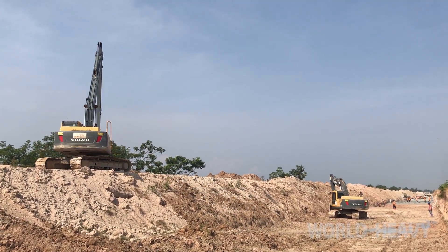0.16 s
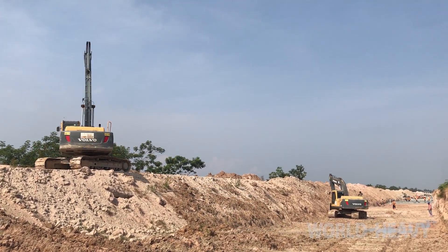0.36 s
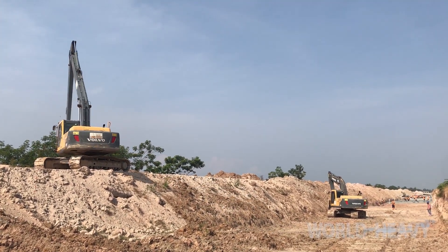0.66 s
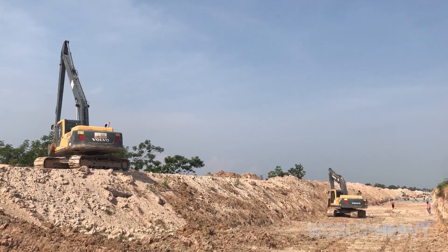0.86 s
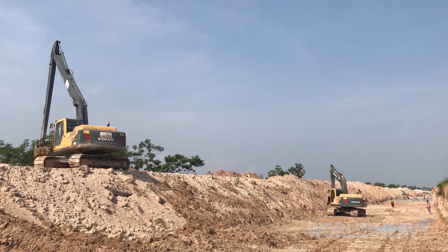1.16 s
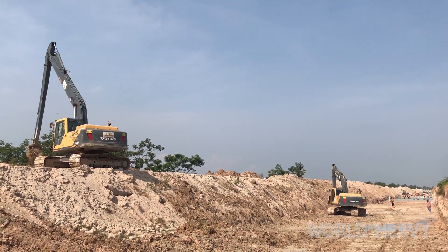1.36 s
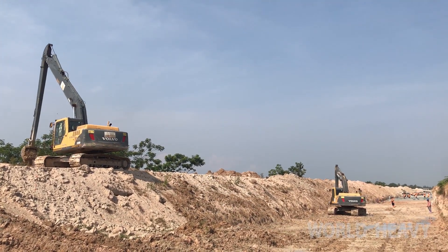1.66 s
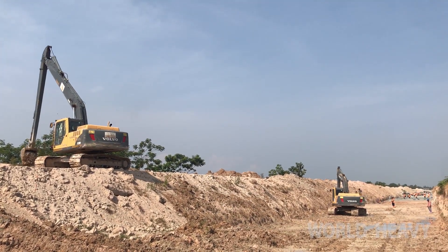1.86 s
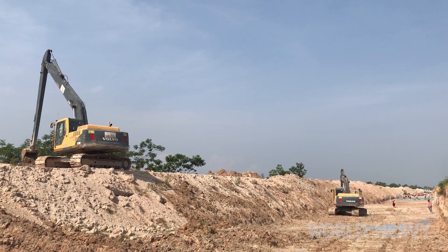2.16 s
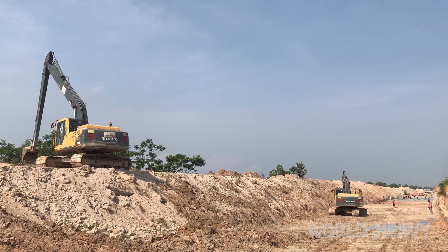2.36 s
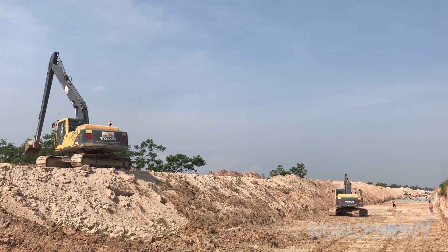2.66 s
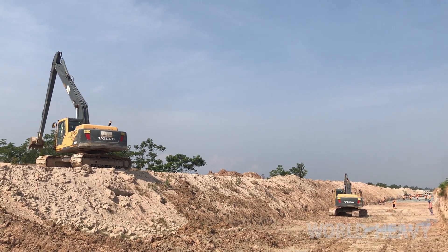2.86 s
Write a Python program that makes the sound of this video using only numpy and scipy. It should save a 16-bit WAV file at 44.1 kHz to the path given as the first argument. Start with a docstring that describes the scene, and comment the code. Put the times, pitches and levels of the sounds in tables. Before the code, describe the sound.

Low diesel engine drone of two excavators, throbbing steadily, with loose metal clanks on open ground

```python
"""A low, throbbing engine drone comes first: two six-cylinder diesel excavators work on an open earth bank.
Their firing tones, sines on each crank angle, lie up to several hertz apart and beat.
Slack pins clank in boom and bucket: contacts excite damped steel modes; dull thuds and echoes follow.
Behind them lie shaped noises: block rumble, and a roar and a hiss pulsing at the near firing rate."""
import sys
import numpy as np
from scipy import signal
from scipy.fft import rfft, irfft
from scipy.io import wavfile
from scipy.ndimage import uniform_filter1d

SR = 44100
rng = np.random.default_rng(int(sys.argv[2]) if len(sys.argv) > 2 else 0)


def volts_from_decibels(level):
    """Turn decibel levels (scalar or array-like) into linear amplitude factors."""
    exponent = np.asarray(level, float) / 20
    return 10 ** exponent


def materialize(psi):
    """Save the field psi as 16-bit PCM at rate SR to the path in sys.argv[1].

    A 1-D psi becomes a single channel; in a 2-D psi each row is a channel.
    """
    bounded = np.clip(np.atleast_2d(psi).T, -1, 1)
    quanta = np.round(bounded * 32767).astype(np.int16)
    wavfile.write(sys.argv[1], SR, quanta)


N = 132300

# Firing tone of the near engine, hunting under load [t/s, f/Hz, rms level/dB]
NEAR_FIRING = [(0.0, 77.6, -35.6), (0.1667, 78.25, -40.8), (0.3333, 80.12, -39.2), (0.5, 81.44, -43.2),
               (0.6667, 80.03, -37.8), (0.8333, 78.95, -45.7), (1.0, 78.08, -38.8), (1.1667, 76.57, -34.6),
               (1.3333, 74.57, -36.7), (1.5, 74.88, -35.2), (1.6667, 78.12, -33.7), (1.8333, 78.02, -36.9),
               (2.0, 77.07, -38.7), (2.1667, 76.92, -37.2), (2.3333, 74.47, -33.7), (2.5, 74.13, -35.3),
               (2.6667, 75.66, -37.8), (2.8333, 76.27, -36.7), (3.0, 77.04, -38.3)]
# Firing tone of the far engine [t/s, f/Hz, rms level/dB]
FAR_FIRING = [(0.0, 73.95, -47.2), (0.1667, 74.26, -45.8), (0.3333, 74.68, -41.0), (0.5, 74.94, -47.5),
              (0.6667, 74.35, -53.9), (0.8333, 74.18, -48.0), (1.0, 74.83, -48.1), (1.1667, 75.43, -45.5),
              (1.3333, 75.67, -43.3), (1.5, 75.93, -43.5), (1.6667, 76.59, -43.3), (1.8333, 76.81, -40.6),
              (2.0, 76.66, -37.3), (2.1667, 76.74, -43.5), (2.3333, 76.63, -40.9), (2.5, 76.6, -37.8),
              (2.6667, 76.78, -38.6), (2.8333, 77.22, -38.1), (3.0, 77.58, -39.9)]
# Upper exhaust orders, before facing and waver [multiple of the firing rate, level/dB]
NEAR_UPPER_ORDERS = [(7 / 6, -57), (2, -59.5), (3, -46.5), (3.7, -60.5), (6, -60.5)]
FAR_UPPER_ORDERS = [(2, -48), (8 / 3, -52.5), (13 / 3, -62.5)]
# Turning of the near house, as gains towards the listener
# [t/s, tailpipe level/dB, radiator level/dB, block level/dB]
HOUSE_TURN = [(0, -8.5, 0, 2.5), (.3, -1.5, -1.5, 1.5), (.55, -9, -1, 4), (.9, -15, 3, 4), (1.25, -7, 0, 1),
              (1.45, 5, 2, 0), (1.7, 1.5, -2.5, 0), (2.0, -0.5, -4, 5.5), (2.3, 1, -5, 1.5),
              (2.5, 2, -4, 0), (2.65, -20, -4, 2.5), (2.85, 3.5, -2.5, 1), (3, -0.5, -0.5, -1.5)]
# Clanks of pins and linkage, levels relative
# [t/s, ring level/dB, ring centre f/Hz, decay constant/s, crack level/dB]
PIN_CLANKS = [(0.148, -31.5, 1030, 0.009, -40.5), (0.162, -47, 1900, .02, -47),
              (0.155, -44, 3620, 0.025, -49.5), (0.192, -38, 860, 0.0088, -51),
              (0.348, -50, 2323, 0.037, -43), (0.363, -26, 660, 0.011, -60),
              (0.369, -36, 1720, 0.0069, -51), (0.388, -29, 660, 0.01, -48), (0.393, -41, 1640, .008, -57),
              (0.413, -36.5, 910, 0.045, -48.5), (0.453, -42, 1580, .015, -60),
              (0.74, -39, 780, 0.021, -51), (0.897, -42.5, 920, 0.033, -59), (1.598, -34, 1140, 0.013, -49),
              (1.616, -41, 2290, 0.0079, -51), (1.619, -40, 1350, 0.011, -49.5),
              (1.64, -44, 2290, 0.018, -48), (1.671, -42.5, 1110, 0.019, -54), (1.8, -48, 2300, 0.075, -47),
              (1.89, -35, 1460, 0.011, -56), (1.893, -32, 644, 0.014, -49),
              (1.9164, -24.5, 1600, 0.002, -38), (1.917, -37, 816, 0.012, -43.5),
              (1.955, -32, 5180, 0.0086, -63), (1.94, -30.5, 2290, 0.0036, -47),
              (1.949, -38, 1380, 0.0074, -44), (1.923, -29, 1110, 0.011, -66),
              (1.976, -43.5, 2290, 0.0035, -43), (2.282, -56, 1370, .008, -51),
              (2.382, -40, 814, 0.013, -52)]
# Modes of the steel boom, damped by grease and earth [f/Hz, relative level/dB, t60/s]
BOOM_MODES = [(620, 0, .03), (710, -1, .025), (830, -1, .035), (960, -3, .03), (1110, -1, .025),
              (1380, -1, .03), (1590, 0, .02), (1700, -1, .025), (2290, -2, .03), (2900, -6, .025),
              (3400, -7, .025), (4130, -9, .025), (5180, -10, .02)]
# Dull bumps of the bucket [t/s, relative level/dB, f/Hz, decay constant/s]
BUCKET_THUDS = [(1.8, -30.5, 228, 0.021), (1.952, -28.5, 315, 0.014), (0.45, -42, 66, 0.041),
                (0.392, -40, 120, 0.043), (0.14, -36, 175, .04)]
# Reflections off the earth banks [delay t/s, level/dB]
BANK_ECHOES = [(.021, -12), (.047, -15), (.083, -19)]
# Relative spectral densities of block rumble, intake and fan roar, and hydraulic and radiator hiss
# [f/Hz, level per hertz/dB]
RUMBLE_SPECTRUM = [(25, -28), (45, -10), (60, -2), (80, -11), (100, 1.5), (130, -1.5), (190, 1),
                   (240, -0.5), (270, -3.5), (330, -0.5), (400, -4), (470, -10), (520, -20.5)]
ROAR_SPECTRUM = [(400, -8.5), (500, -4), (620, 2.5), (950, -2.5), (1100, -2), (1650, -4), (1900, -10.5),
                 (2300, -7.5), (2700, -11), (3600, -11), (4400, -13), (4900, -18), (5500, -17),
                 (6500, -20.5), (7600, -27), (9000, -26.5)]
HISS_SPECTRUM = [(5000, 4.5), (7600, -7), (9200, 2.5), (10600, -5), (11500, 7.5), (12200, -10),
                 (13000, -12)]

IN_STEP_S = 0.2213  # a moment when both engines fire together
WAVER_DB, WAVER_HZ = 3.5, 9.0  # rms swing and corner rate of the upper orders
FAR_FOLLOWS, FAR_MEAN_DB = 0.55, -43  # share of the far tone's level swing its upper orders follow
RISE_SHARE = 0.25  # time constant of a burst's rise, as a share of its decay constant
RUMBLE_DB, ROAR_DB, HISS_DB = -44, -47.5, -60.5  # rms before turning and pulsing
KNOCK_DEPTH = 0.068  # amplitude modulation by the near firing


def engine(firing, orders, facing_db):
    """Harmonic synthesis: integrated firing rate gives the phase of all orders; returns sound and angle."""
    hz, tone_db = in_time(firing)
    angle = 2 * np.pi * np.cumsum(hz) / SR
    angle = angle - angle[int(IN_STEP_S * SR)]
    upper = np.zeros(N)
    for multiple, level_db in orders:
        level = volts_from_decibels(level_db + WAVER_DB * drift(WAVER_HZ))
        upper += level * np.cos(multiple * angle + rng.uniform(0, 2 * np.pi))
    return np.sqrt(2) * (volts_from_decibels(tone_db) * np.sin(angle) + volts_from_decibels(facing_db) * upper), angle


def near_engine(pipe_db):
    """Directivity: the turning tailpipe raises and lowers the upper exhaust orders."""
    return engine(NEAR_FIRING, NEAR_UPPER_ORDERS, pipe_db)


def far_engine():
    """Common-source variation: the upper orders follow part of the firing tone's level swing."""
    tone_db = in_time(FAR_FIRING)[1]
    sound, _ = engine(FAR_FIRING, FAR_UPPER_ORDERS, FAR_FOLLOWS * (tone_db - FAR_MEAN_DB))
    return sound


def contact_forces():
    """Random impact process: dense small contacts of either sign and chance size, on average 5000 a second."""
    happens = rng.random(N) < 5000 / SR
    size = 0.27 * volts_from_decibels(2.0 * np.minimum(rng.exponential(1, N), 3))
    return size * rng.choice([-1, 1], N) * happens


def cracks(crack_db, shapes):
    """Broadband radiation of impact: band-passed noise under the clank envelopes."""
    noise = signal.lfilter([1], [1, -0.9], rng.standard_normal(N))
    noise = band(band(noise, 700, 6500), 300, 9000)
    return rms_one(noise) * np.dot(volts_from_decibels(crack_db), shapes)


def clanks():
    """Modal excitation: a first blow and dying rattle drive the damped boom modes near each ring centre."""
    start, ring_db, centre_hz, length, crack_db = np.transpose(PIN_CLANKS)
    shapes = np.array([burst(s, decay) for s, decay in zip(start, length)])
    contacts = contact_forces()
    out = cracks(crack_db, shapes)
    blow_at = ((start + RISE_SHARE * length) * SR).astype(int)
    blow_share = np.minimum(1, 0.005 / length)  # full blow for decay constants up to 5 ms
    spread_db = rng.normal(0, 1.2, (len(PIN_CLANKS), len(BOOM_MODES)))
    for k, (hz, level_db, t60) in enumerate(BOOM_MODES):
        octaves_off = np.log2(hz / centre_hz)
        nearness = np.exp(-0.5 * (octaves_off / 0.15) ** 2)
        strength = volts_from_decibels(ring_db + spread_db[:, k]) * nearness
        force = contacts * rng.normal(1, 1.0, N) * np.dot(strength, shapes)
        force[blow_at] += 1.6 * strength * blow_share
        # two-pole resonator: pole radius from t60, pole angle from the mode frequency
        r, w = volts_from_decibels(-60 / (t60 * SR)), 2 * np.pi * hz / SR
        ring = signal.lfilter([0, np.sin(w)], [1, -2 * r * np.cos(w), r * r], force + 1e-18)
        out = out + volts_from_decibels(level_db - 6.5) * ring
    return band(out, 480, 12000)  # the thin steel gives off little bass


def thuds():
    """Damped low resonance: each bump is a slowly rising, decaying sine roughened by narrow-band noise."""
    noise, t = rng.standard_normal(N), np.arange(N) / SR
    out = np.zeros(N)
    for start, level_db, hz, length in BUCKET_THUDS:
        envelope = uniform_filter1d(burst(start, length), size=500)
        tone = np.sin(2 * np.pi * hz * (t - start))
        rough = 0.38 * rms_one(band(noise, hz / 1.13, hz * 1.2))
        out += volts_from_decibels(level_db) * envelope * (tone + rough)
    return out


def banks(x):
    """Specular reflection with treble loss: delayed, low-passed copies join the direct sound."""
    dull = signal.lfilter([0.4], [1, -0.6], x)
    out = x
    for delay, level_db in BANK_ECHOES:
        out = out + volts_from_decibels(level_db) * np.r_[np.zeros(int(delay * SR)), dull][:N]
    return out


def block_rumble(block_db):
    """Structure-borne radiation: low shaped noise whose level follows the turning of the house."""
    return volts_from_decibels(RUMBLE_DB + block_db) * coloured(RUMBLE_SPECTRUM, patchy_db=0.5)


def intake_roar(angle):
    """Amplitude modulation: intake and fan noise swells slightly with each near firing."""
    return volts_from_decibels(ROAR_DB) * coloured(ROAR_SPECTRUM, patchy_db=1.5) * (1 + KNOCK_DEPTH * np.cos(angle))


def hydraulic_hiss(angle, radiator_db):
    """Directivity and modulation: high noise follows the radiator's facing and pulses with near firing."""
    hiss = volts_from_decibels(HISS_DB + radiator_db) * coloured(HISS_SPECTRUM, patchy_db=0.6)
    return hiss * (1 + KNOCK_DEPTH * np.cos(angle))


def coloured(spectrum, patchy_db):
    """Spectral shaping: filtered noise of rms 1 whose octave bands flicker independently."""
    hz, db = np.transpose(spectrum)
    log_f = np.log(np.fft.rfftfreq(N, 1 / SR) + 1)
    gain = volts_from_decibels(np.interp(log_f, np.log(hz), db, left=-60, right=-60))
    shaped = rfft(rng.standard_normal(N)) * gain
    out = np.zeros(N)
    for centre in np.log(30 * 2.0 ** np.arange(10)):
        window = np.clip(1 - abs(log_f - centre) / np.log(2), 0, 1)
        out += irfft(shaped * window, N) * volts_from_decibels(patchy_db * drift(8.5))
    return rms_one(out)


def burst(start, length):
    """Transient envelope: a rise in proportion to the decay constant, then an exponential fall."""
    t = np.maximum(np.arange(N) / SR - start, 0)
    return 2 * (1 - np.exp(-t / (RISE_SHARE * length))) ** 2 * np.exp(-t / length)


def drift(rate_hz):
    """Low-pass random process: slow fluctuation of rms 1 with a double pole at the given rate."""
    hop = 40  # samples between the slow values
    r = np.exp(-2 * np.pi * rate_hz * hop / SR)
    white = rng.standard_normal(N // hop + 2002)
    slow = signal.lfilter([1], [1, -2 * r, r * r], white)[2000:]  # settled part
    return np.interp(np.arange(N) / hop, np.arange(len(slow)), rms_one(slow))


def band(x, low_hz, high_hz):
    """Band-pass filtering: Butterworth sections keep the stated frequency range."""
    return signal.sosfilt(signal.butter(2, [low_hz, high_hz], "band", fs=SR, output="sos"), x)


def rms_one(x):
    """Power normalisation: scales the root mean square to 1."""
    return x / np.sqrt(np.mean(x ** 2) + 1e-20)


def in_time(rows):
    """Linear interpolation: turns table columns into curves, one value a sample."""
    s, *columns = np.transpose(rows)
    return [np.interp(np.arange(N) / SR, s, c) for c in columns]


def scene():
    """Superposition: engines, ironwork with echoes, rumble, roar and hiss add linearly."""
    pipe_db, radiator_db, block_db = in_time(HOUSE_TURN)
    near, angle = near_engine(pipe_db)
    engines = near + far_engine()
    ironwork = banks(clanks() + thuds())
    background = block_rumble(block_db) + intake_roar(angle) + hydraulic_hiss(angle, radiator_db)
    return (engines + ironwork + background)[None]


def roll_off(x):
    """The treble ends steeply here."""
    return signal.sosfilt(signal.butter(12, 13590, fs=SR, output="sos"), x)


def record(dry):
    """Low-pass filtering: a steep Chebyshev filter holds everything above 13.5 kHz at least 50 dB down."""
    finished_mix = signal.sosfilt(signal.cheby2(10, 50, 13500, fs=SR, output="sos"), dry)
    return roll_off(finished_mix)


dry = scene()
out = record(dry)
materialize(out)
```